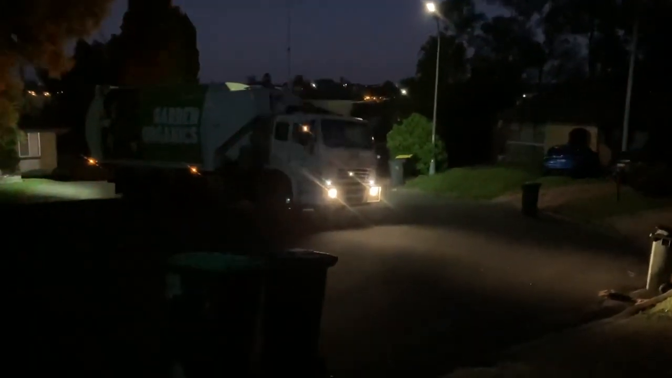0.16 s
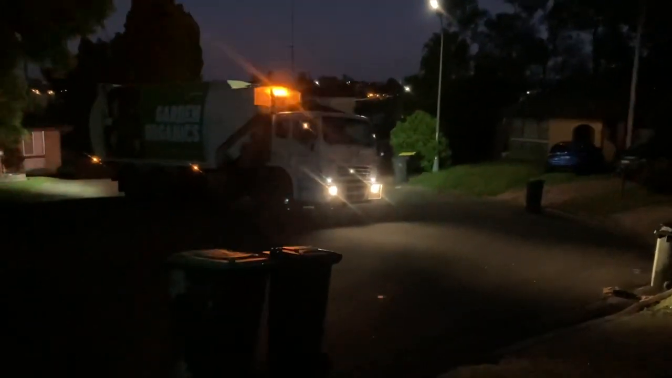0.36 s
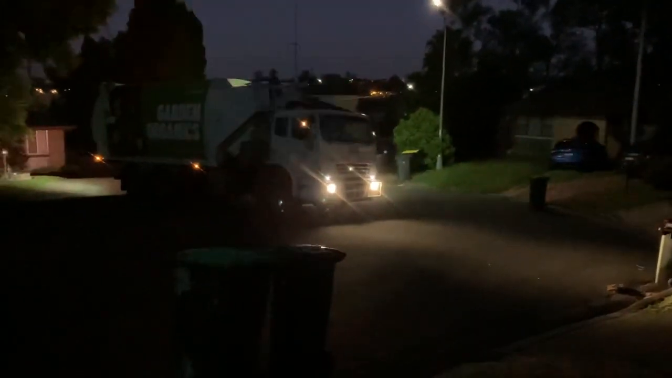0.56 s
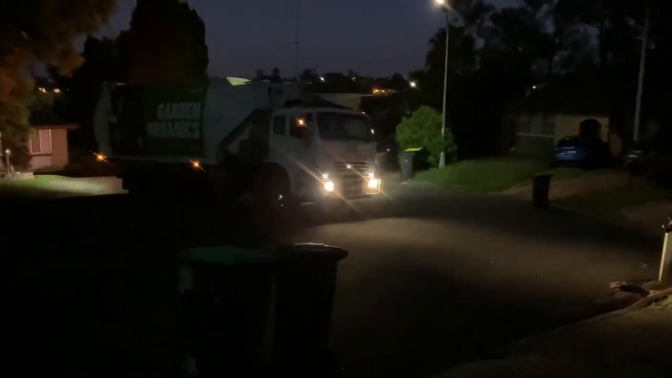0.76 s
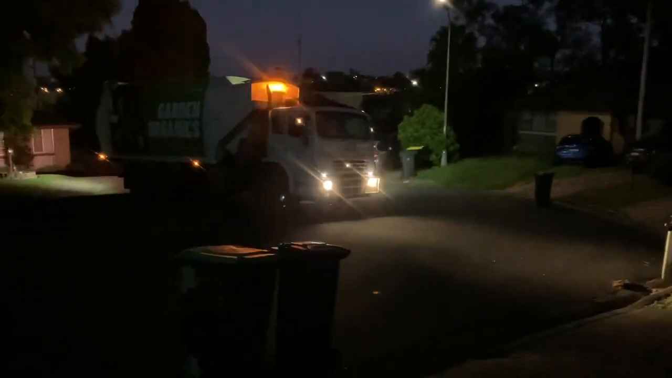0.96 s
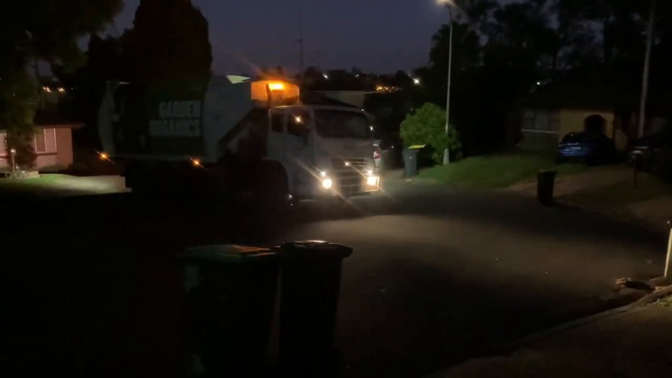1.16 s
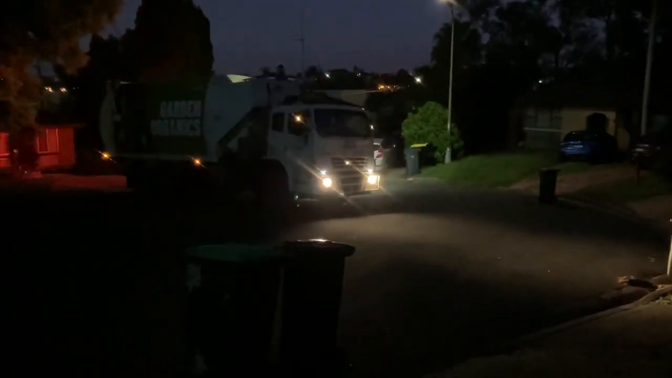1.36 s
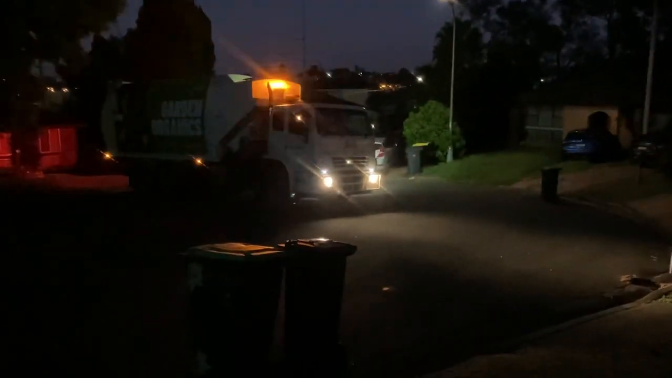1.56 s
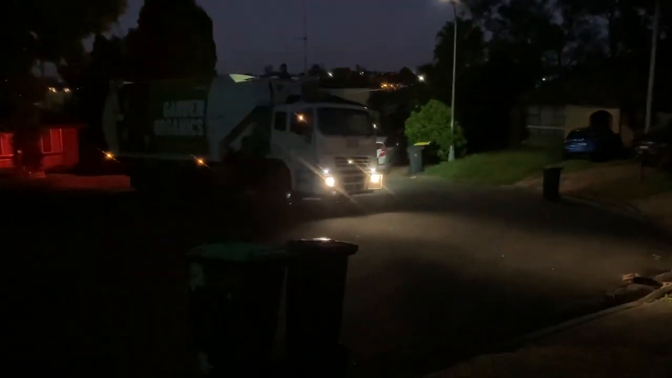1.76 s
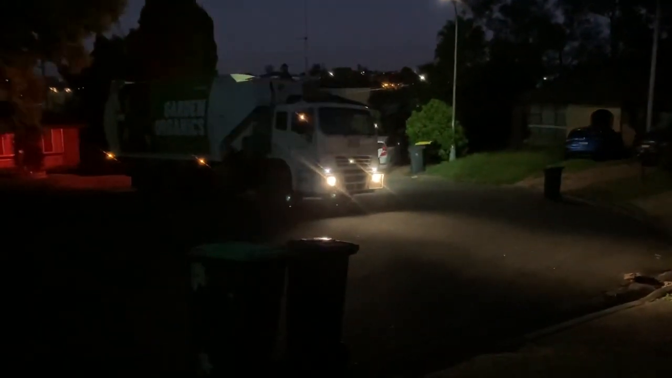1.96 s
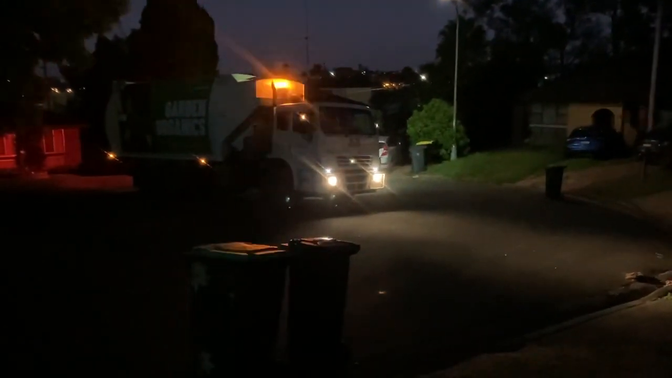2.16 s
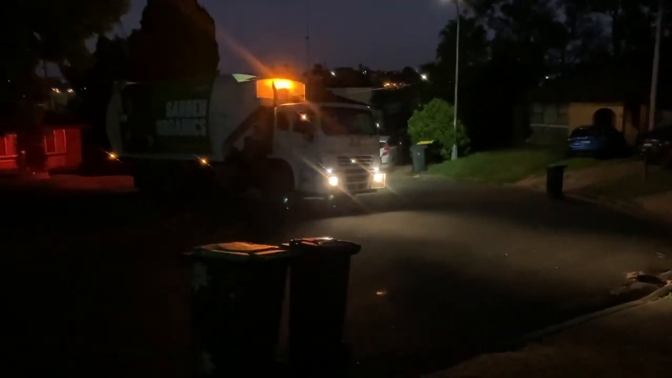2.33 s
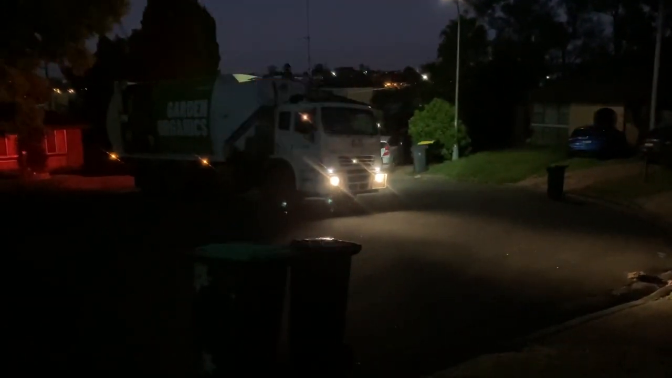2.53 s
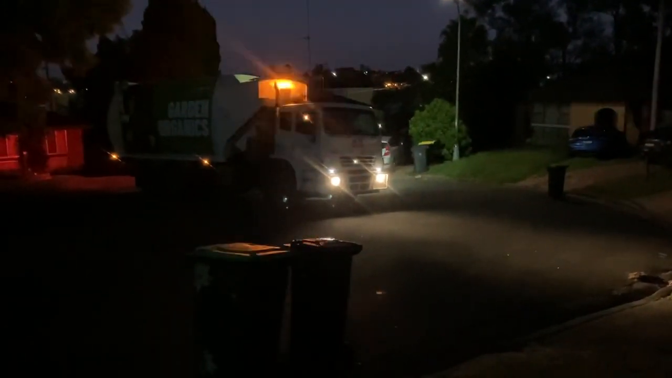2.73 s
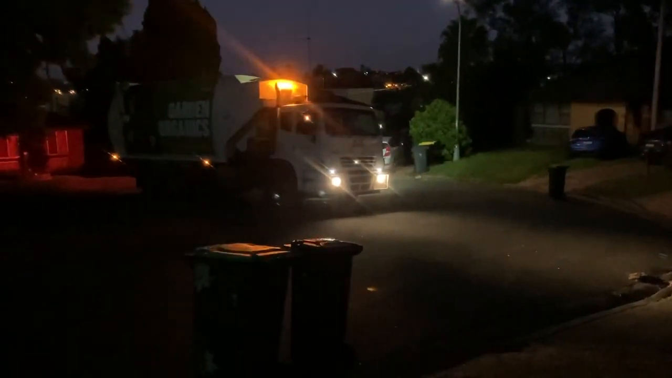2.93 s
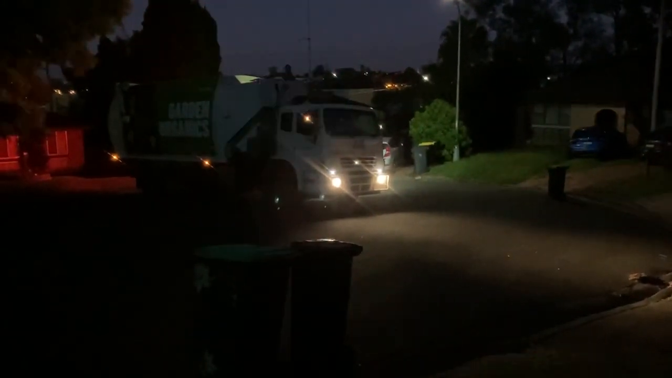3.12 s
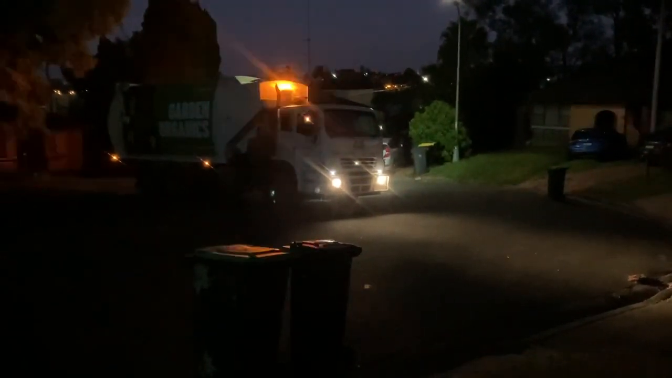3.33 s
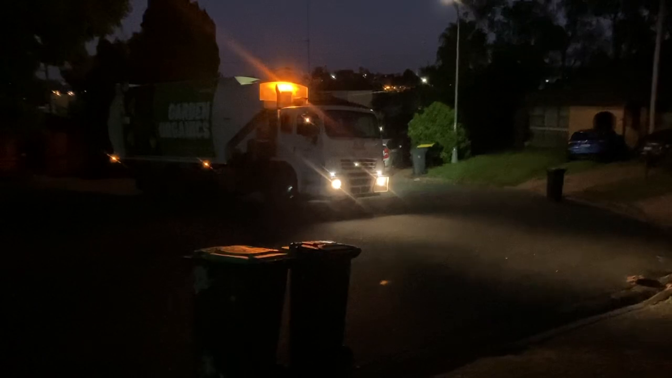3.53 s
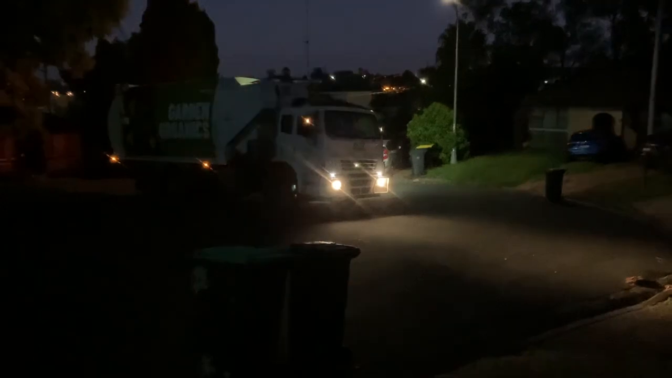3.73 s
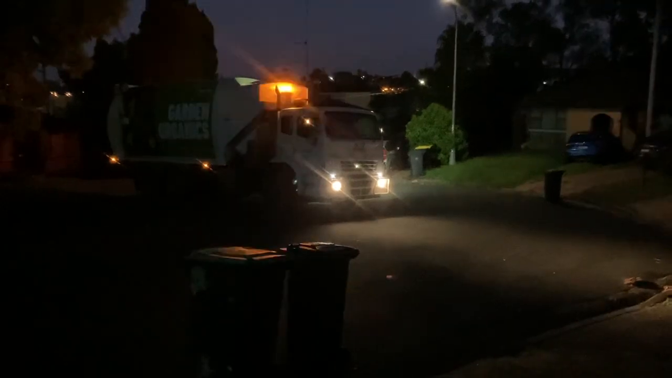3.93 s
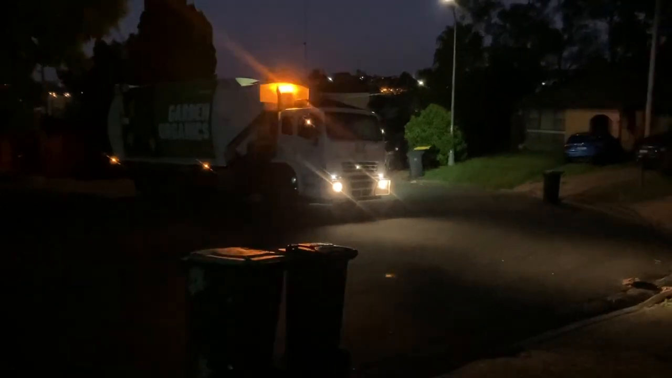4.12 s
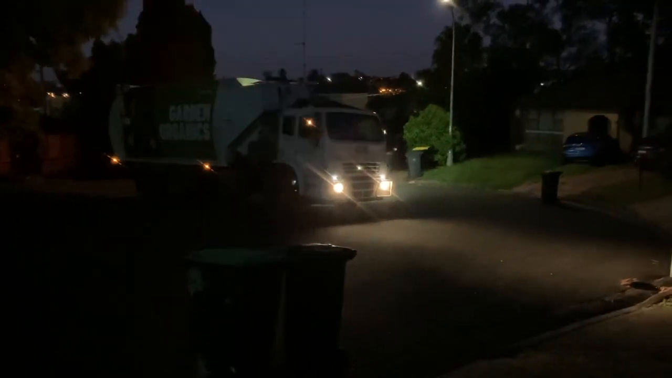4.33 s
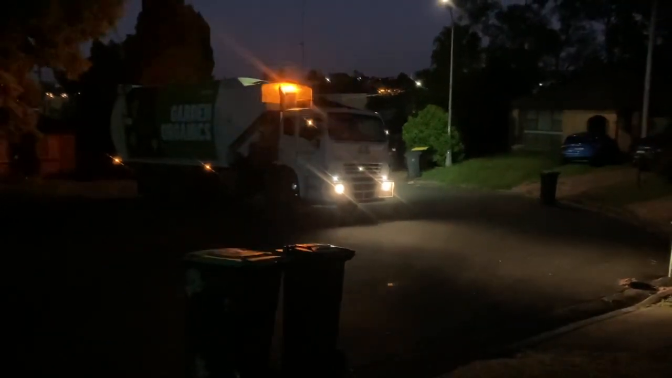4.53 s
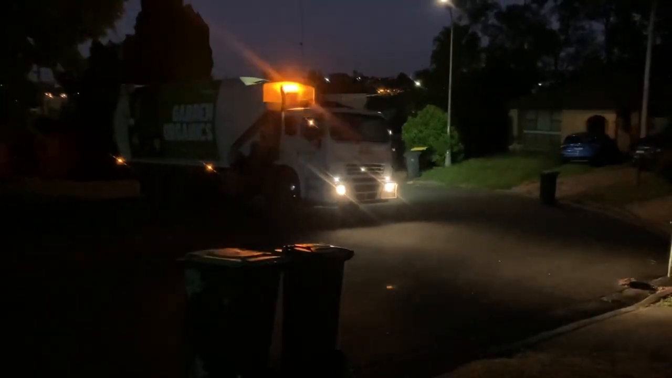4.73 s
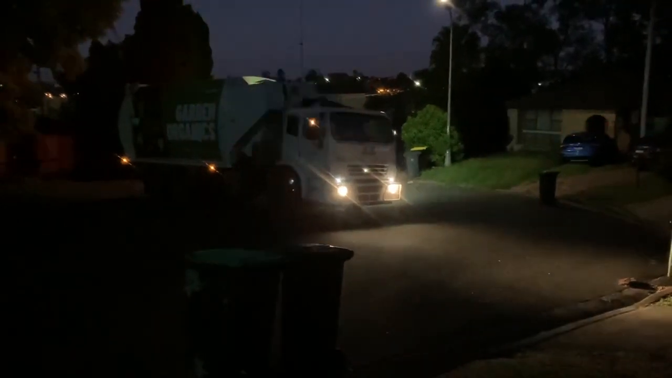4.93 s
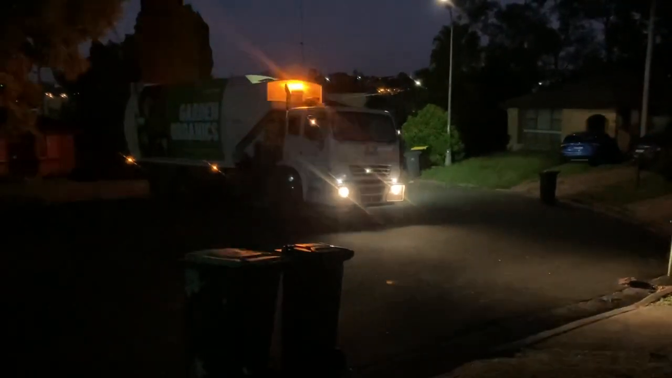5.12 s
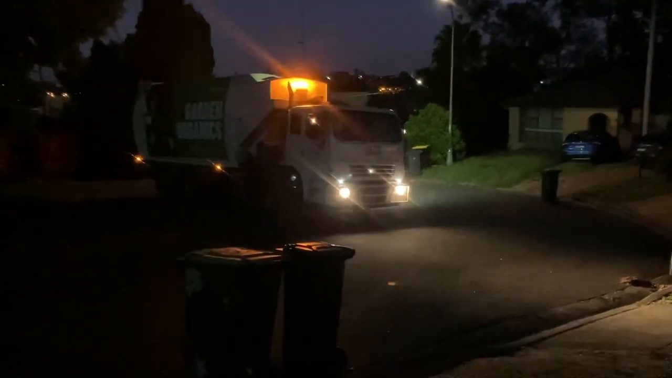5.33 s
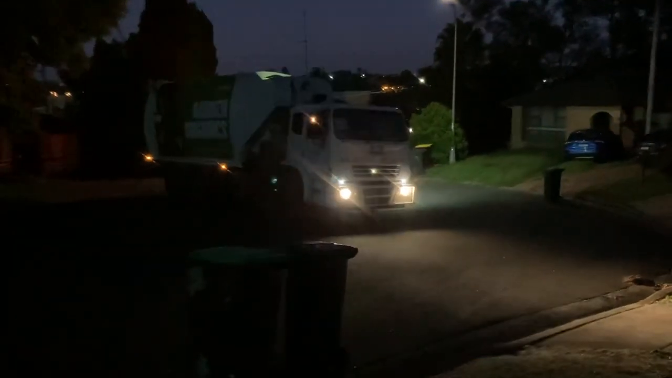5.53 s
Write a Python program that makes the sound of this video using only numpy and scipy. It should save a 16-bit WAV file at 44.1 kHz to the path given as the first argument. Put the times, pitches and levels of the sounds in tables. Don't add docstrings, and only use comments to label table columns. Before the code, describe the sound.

Low throbbing truck idle with gear whine and faint brake squeal, a sharp air-brake hiss, then roaring engine revs with rising turbo whine.

```python
import sys
import numpy as np
from scipy import signal
from scipy.fft import rfft, irfft, next_fast_len
from scipy.io import wavfile
from scipy.ndimage import uniform_filter1d, map_coordinates

SR = 44100
rng = np.random.default_rng(int(sys.argv[2]) if len(sys.argv) > 2 else 0)


def elevation(decibels):
    levels = np.asarray(decibels, float)
    return 10 ** (levels / 20)


def inscribe(sig):
    pcm = np.round(np.clip(np.atleast_2d(sig).T, -1, 1) * 32767)
    wavfile.write(sys.argv[1], SR, pcm.astype(np.int16))


N = 246078

# start_s, firing_hz, exhaust_pulse_db
CRANK = [(0.0, 42.1, -41.5), (0.04, 42.2, -32), (1.43, 42.6, -31), (1.79, 43.9, -31.5), (1.86, 44.23, -44),
         (2.22, 41.97, -25), (3.56, 42.6, -26.5), (3.6, 42.75, -28), (3.76, 50.76, -24), (3.87, 55.94, -18),
         (4.06, 60.56, -19.5), (4.1, 61.1, -15), (4.3, 56.23, -23.5), (4.57, 65.04, -14),
         (4.63, 66.55, -18), (5.04, 71.6, -15), (5.33, 60.7, -20), (5.58, 60.6, -15.5)]
IDLE_HZ = 42.5
# idle_db, db_per_octave of revs, full_pedal_db, flutter_db
NOISE_RULES = [
    (-38, 6.8, 1.81, 1),
    (-39.5, 6, 0.68, 0.97),
    (-42, 5.9, 2.4, 0.69),
]


def unit(x):
    return x / np.sqrt(np.mean(x ** 2) + 1e-20)


def along(points, hz):
    f, v = np.transpose(points)
    return np.interp(np.log(hz + 1), np.log(f + 1), v)


def curves(rows):
    s, *cols = np.transpose(rows)
    return [np.interp(np.arange(N) / SR, s, c) for c in cols]


def wobble(rate_hz):
    knots = rng.standard_normal(int(N * rate_hz / SR) + 4)
    return map_coordinates(knots, [np.arange(N) * rate_hz / SR])


def filtered(x, response):
    m = next_fast_len(N + SR // 4)
    return irfft(rfft(x, m) * response(np.fft.rfftfreq(m, 1 / SR)), m)[..., :N]


def noise(response, gate=1, patchy_db=0):
    z = signal.stft(gate * rng.standard_normal((2, N)), nperseg=512)[2]
    patches = uniform_filter1d(rng.standard_normal(z.shape[1:]), size=5, axis=0)
    patches = uniform_filter1d(patches, size=8, axis=1)
    patched = signal.istft(z * elevation(patchy_db * unit(patches)), nperseg=512)[1][:, :N]
    return unit(filtered(patched, response))


def tone(hz, blur_hz):
    flutter = np.array([wobble(39.5), wobble(41.2)])
    phase = 2 * np.pi * np.cumsum(hz + blur_hz * flutter, axis=1) / SR
    return np.sqrt(2) * np.sin(phase)


def trapezoid(start_s, length_s, rise_s, fall_s):
    t = np.arange(N) / SR - start_s
    return np.clip(np.minimum(t / rise_s, 1 - (t - length_s) / fall_s), 0, 1)


def swells(rows):
    t = np.arange(N) / SR
    return sum(elevation(db - np.minimum(20 * np.abs((t - s) / half_s) ** 3, 90)) for s, half_s, db, *_ in rows)


def line(rows, blur_hz, flutter_db):
    hz, = curves([(s, pitch_hz) for s, _, _, pitch_hz in rows])
    return swells(rows) * elevation(flutter_db * wobble(30.1)) * tone(hz, blur_hz)


def effort(rule, rate_hz):
    # start_s, length_s, depth (0-1)
    pushes = [
        (3.603, .42, 0.94),
        (4.324, .72, 0.92),
        (5.364, .3, 0.44),
    ]
    kick, kick_s = 0.5, 0.12
    idle_db, octave_db, pedal_db, flutter_db = rule
    t = np.arange(N) / SR
    pedal = 0
    for s, length_s, depth in pushes:
        push = depth * trapezoid(s, length_s, rise_s=0.12, fall_s=0.12)
        pedal = pedal + push * (1 + kick * np.exp(-np.abs(t - s) / kick_s))
    octaves = np.log2(curves(CRANK)[0] / IDLE_HZ)
    return idle_db + octave_db * octaves + pedal_db * pedal + flutter_db * wobble(rate_hz)


def firing_turns():
    return np.cumsum(curves(CRANK)[0]) / SR


def firing_gate(depth, sharp):
    turns = firing_turns()
    count = turns.astype(int)
    cylinder_db = np.resize(rng.normal(0, 3.8, 6), count[-1] + 1)
    size_db = cylinder_db + rng.normal(0, 3.8, count[-1] + 1)
    return 1 - depth + depth * sharp * elevation(size_db[count]) * np.exp(-sharp * (turns - count))


def exhaust():
    # idle_db, db_per_octave of revs, full_pedal_db, flutter_db
    overtone_rules = [
        (-33, 9, .5, 1.5),
        (-34.5, 3.5, 3.5, 1.5),
        (-44.5, 7, 2, 2.5),
    ]
    # firing_order, level_db over rumble; half orders come from uneven cylinders
    upper_orders = [(1.5, -15.5), (2.5, -12), (3.5, -11.5), (4.5, -20), (5, -16.5), (6, -21), (7, -20.5)]
    # hz, level_db (per Hz)
    rumble_shape = [(30, -42), (45, -5), (75, -0.5), (150, 0), (250, -4), (400, -6.5), (500, -15.5),
                    (800, -45.5)]
    # start_s, length_s, dip_db
    unload = (1.7, 0.18, 14.5)
    start_s, length_s, depth_db = unload
    dip_db = depth_db * trapezoid(start_s, length_s, rise_s=0.047, fall_s=0.11)
    turns = firing_turns()
    order_db = [curves(CRANK)[1]] + [effort(rule, rate_hz=7) - dip_db for rule in overtone_rules]
    low = 0
    for k, db in enumerate(order_db):
        low = low - elevation(db) * np.cos(2 * np.pi * (k + 1) * turns - k * k / 8)
    rumble_db = effort(NOISE_RULES[0], rate_hz=5.4)
    high = 0
    for order, db in upper_orders:
        level = elevation(rumble_db + db + 1.5 + 1.6 * wobble(5))
        high = high + level * np.sin(2 * np.pi * (order * turns + rng.random()))
    gas = noise(lambda f: elevation(along(rumble_shape, f)), firing_gate(depth=0.066, sharp=0.91))
    rumble = elevation(rumble_db + 5.5 - 0.19 * dip_db) * gas
    return np.sqrt(2) * (low + high) * [[1], [0]] + rumble


def block():
    # hz, width_hz, level_db
    modes = [(615.6, 61, 0), (757, 44, -2), (887, 70, -3), (1103, 75, -1), (1524, 80, -12)]
    # hz, level_db (per Hz)
    clatter_shape = [(600, -5.5), (1200, -5.5), (1800, 1.5), (2150, -4.5), (2450, 0), (2800, -3.5),
                     (4200, -7.5), (5500, -9), (8000, -13), (12000, -27.5)]

    def panels(f):
        return sum((-1) ** k * elevation(db) * 1j * f * w / (c * c - f * f + 1j * f * w)
                   for k, (c, w, db) in enumerate(modes))

    panel_db, clatter_db = [effort(rule, rate_hz=5.4) for rule in NOISE_RULES[1:]]
    ringing = noise(panels, firing_gate(depth=0.27, sharp=0.81), patchy_db=-0.5)
    clatter = noise(lambda f: elevation(along(clatter_shape, f)), firing_gate(depth=0.17, sharp=0.92), patchy_db=1.5)
    return elevation(panel_db + 5) * ringing + elevation(clatter_db + 4) * clatter


def gear_pump():
    # centre_s, half_length_s, level_db
    whine_swells = [(.33, .62, -35.5), (1.2, .45, -44), (1.68, .13, -33), (1.93, .17, -33.5), (3.8, .055, -32),
                    (4.2, .35, -44)]
    # idle_db, db_per_octave of revs, full_pedal_db, flutter_db
    load_rule = (-53, 16, 1, 1.5)
    hz = curves(CRANK)[0]
    level = swells(whine_swells) + elevation(effort(load_rule, rate_hz=5))
    ragged = elevation((hz - 30) / 10 * wobble(25))
    return level * ragged * tone(14.2 * hz, blur_hz=1 + .35 * (hz - IDLE_HZ).clip(0))


def valves():
    # start_s, level_db, length_s
    releases = [
        (-.02, -38.5, .13),
        (1.571, -24, 0.43),
        (2.195, -48, 0.066),
        (2.59, -42, 0.15),
        (3.171, -31.5, 0.34),
    ]
    # hz, level_db (per Hz)
    jet_shape = [(1500, -21), (2600, -12), (4000, -7), (5100, -5), (5700, -7), (6500, 0), (7400, -6.5),
                 (8500, 1), (12000, -0.5), (13300, -2), (14500, -14), (15700, -2.5)]
    open_s, drain_db, burst_db, burst_s = .022, 24, 2, 0.029
    t = np.arange(N) / SR
    flow = 0
    for s, db, length_s in releases:
        opening = np.clip(1 + (t - s) / open_s, 0, 1) ** 2
        puff_db = burst_db * np.exp(-np.abs(t - s) / burst_s)
        drained_db = drain_db * (np.maximum(t - s, 0) / length_s) ** 2
        flow = flow + opening * elevation(db - 1 + puff_db - drained_db)
    jet = noise(lambda f: elevation(along(jet_shape, f)), patchy_db=1.5)
    return flow * elevation(1.2 * wobble(60)) * jet * [[1], [.3]]


def turbo():
    # start_s, blade_pitch_hz
    wheel = [(0, 6120), (3.62, 6150), (4.02, 7650), (4.35, 7700), (4.6, 9000), (4.8, 9200), (5.02, 10000),
             (5.25, 9400), (5.58, 9150)]
    # idle_db, db_per_octave of revs, full_pedal_db, flutter_db
    intake_rules = [
        (-50.5, 25, 2.6, .8),
        (-45.5, 7.4, 6.6, 0.53),
    ]
    # hz, level_db (per Hz)
    rush_shape = [(2500, -51), (4500, 4), (6000, -15), (6900, 5.5), (7500, -9.5), (9500, 2), (10500, -3.5),
                  (12000, -6.5), (13800, -11), (14700, -23), (15300, -26), (15700, -30)]
    hz, = curves(wheel)
    whine_db, rush_db = [effort(rule, rate_hz=14) for rule in intake_rules]
    narrow = noise(lambda f: 1 / (1 + (f / 110) ** 4))
    wide = noise(lambda f: 1 / (1 + (f / 330) ** 2))
    climb_hz_per_s = uniform_filter1d(np.gradient(hz) * SR, size=SR // 8)
    share = np.clip(climb_hz_per_s / 1800 + (hz > 8500), .3, .9)
    fuzz = (1 - share) * narrow + share * wide + 0.096 * (1 - share)
    whine = np.sqrt(2) * fuzz * np.sin(2 * np.pi * np.cumsum(hz) / SR)
    fade_db = 7 * np.maximum(hz / 1000 - 7.7, 0)
    rush = noise(lambda f: elevation(along(rush_shape, f)), patchy_db=3.0)
    return elevation(whine_db - fade_db) * whine + elevation(rush_db) * rush


def driveline():
    # centre_s, half_length_s, level_db, pitch_hz
    drone = [
        (.2, .3, -48, 62.5),
        (.55, 0.15, -43, 70.5),
        (1, .14, -34, 73.86),
        (1.27, .1, -27, 84.5),
        (1.82, .09, -25, 87.9),
    ]
    # centre_s, half_length_s, level_db, pitch_hz
    hum = [(5.48, .18, -37.5, 409)]
    return line(drone, blur_hz=.7, flutter_db=1) + line(hum, blur_hz=1, flutter_db=1)


def brake():
    # centre_s, half_length_s, level_db, pitch_hz
    groan = [(.66, .15, -47.5, 4095)]
    # centre_s, half_length_s, level_db, pitch_hz
    squeal = [
        (1, 0.11, -49.5, 10460),
        (1.21, 0.12, -45.5, 10540),
        (1.35, .06, -56, 10800),
    ]
    rough = noise(lambda f: 1 / (1 + (f / 120) ** 4))
    carrier = np.sqrt(2) * np.sin(2 * np.pi * groan[0][3] * np.arange(N) / SR)
    return swells(groan) * rough * carrier + line(squeal, blur_hz=12, flutter_db=1.5)


def ports(field):
    # hz, phase_turns
    port_phase = [(0, 0), (200, 0), (850, -.33), (1450, -.05), (2250, -1), (2600, -.5), (3150, -.5),
                  (5250, -3.5), (6100, -4.04), (7300, -3.98), (9150, -3.5), (13200, -2.55), (14400, -2.46),
                  (15300, -2)]
    # hz, likeness of the ports (0-1)
    likeness = [(60, .998), (250, .95), (700, .82), (1100, .7), (1400, .15), (1950, .55), (2400, .2),
                (2900, .78), (3500, .2), (3900, .6), (5250, .75), (5700, .2), (6400, .9), (7000, .975)]
    # hz, left_minus_right_db
    lean = [(60, -1.2), (200, -1.7), (350, -3.5), (500, 0), (650, 3), (900, 8.5), (1150, 6), (1400, 8.5),
            (2200, 4), (3000, 1.5), (5000, .5), (7000, 0)]

    def turns(f):
        ramp = np.interp(f, *np.transpose(port_phase))
        return ramp - .75 * (f > 7300) * np.sin(4 * np.pi * ramp) / (4 * np.pi)

    def spread(f):
        blur = 1 - .38 * (f > 7000) * np.sin(2 * np.pi * turns(f)) ** 2
        angle = np.arccos(np.clip(along(likeness, f) * blur, -1, 1)) / 2
        return np.array([np.cos(angle), np.sin(angle)])

    def shading(f):
        half = elevation(along(lean, f) / 2) * np.exp(-1j * np.pi * turns(f))
        return np.array([half, 1 / half])

    both, split = filtered(field, spread)
    return filtered(np.array([both + split, both - split]), shading)


def scene():
    engine = exhaust() + block() + gear_pump()
    return ports(engine + valves() + turbo() + driveline() + brake())


def low_pass(x):
    return signal.sosfilt(signal.butter(12, 17100, fs=SR, output="sos"), x)


def record(dry):
    band = filtered(dry, lambda f: (f < 15740) / (1 + (30 / (f + 1)) ** 8))
    return low_pass(band)


dry = scene()
out = record(dry)
inscribe(out)
```